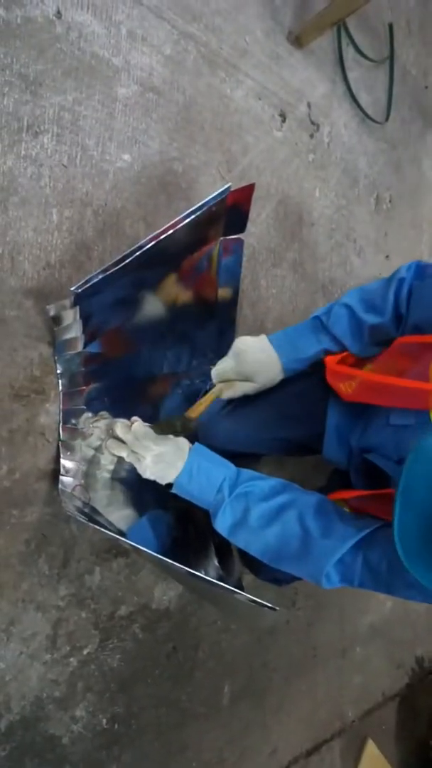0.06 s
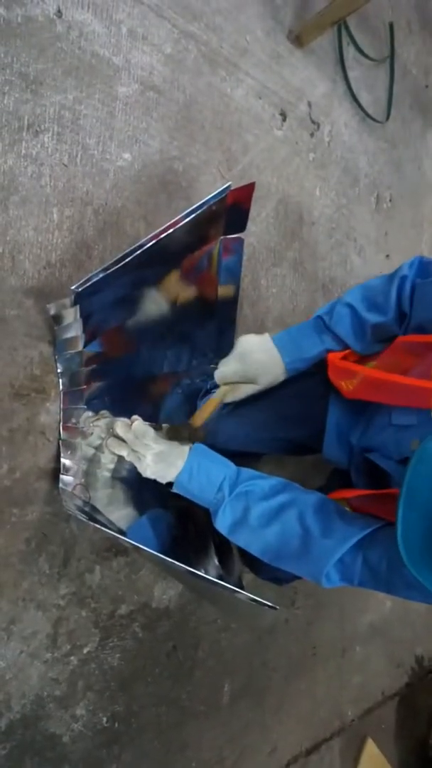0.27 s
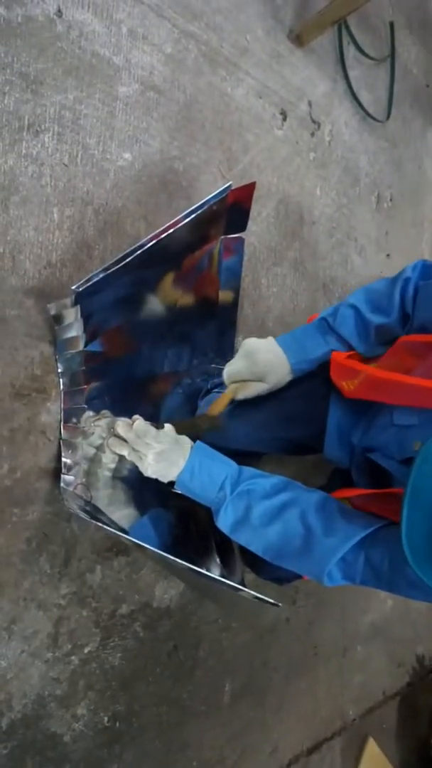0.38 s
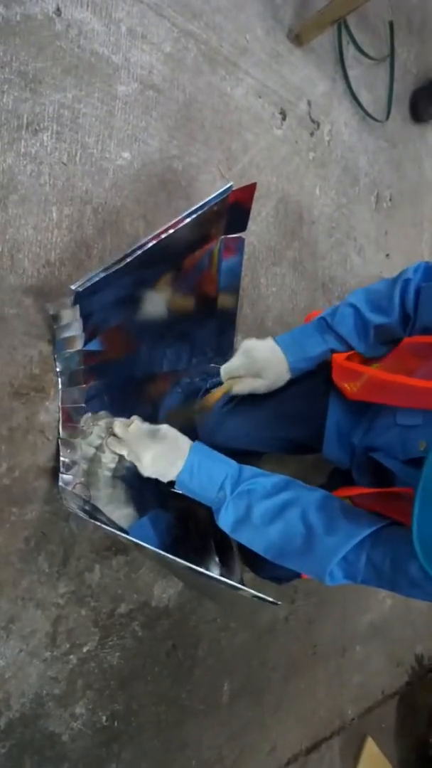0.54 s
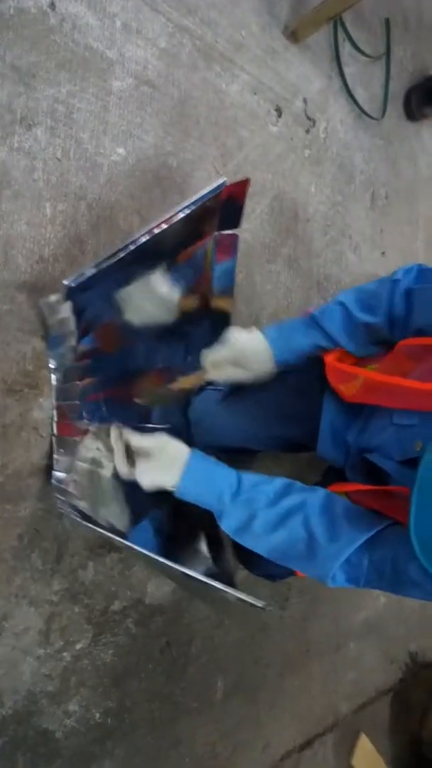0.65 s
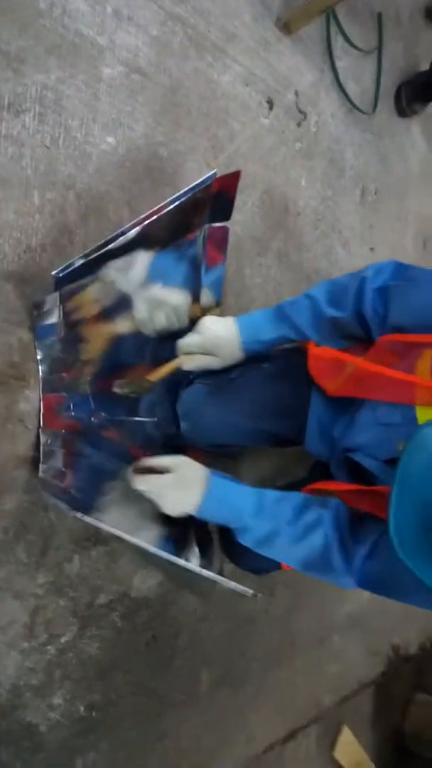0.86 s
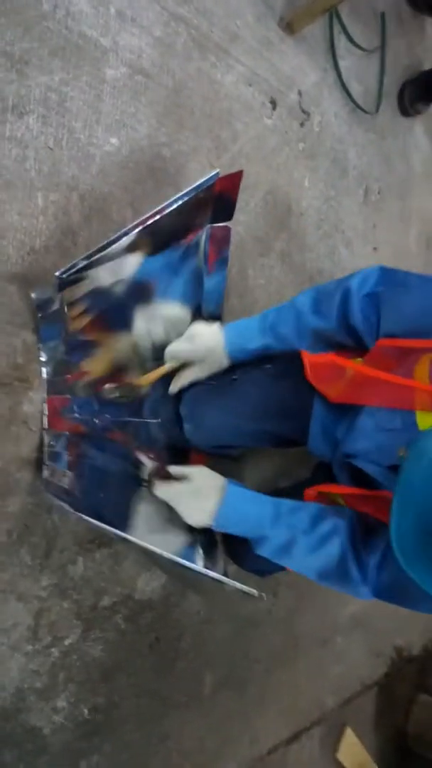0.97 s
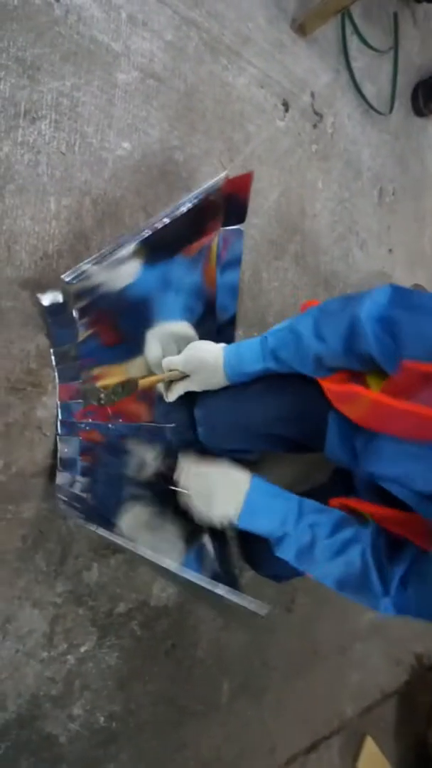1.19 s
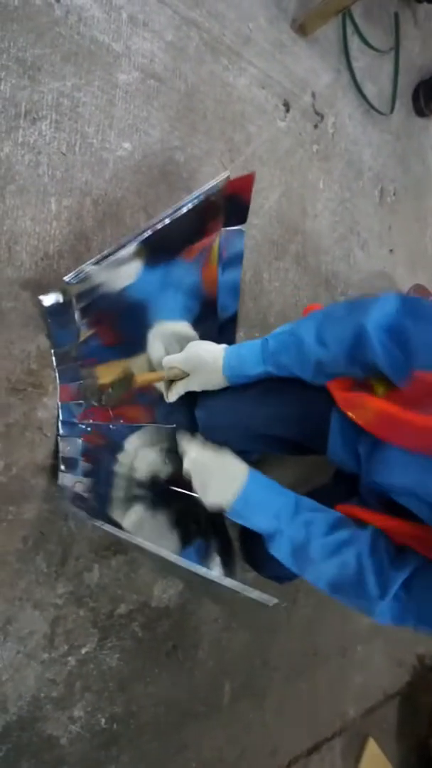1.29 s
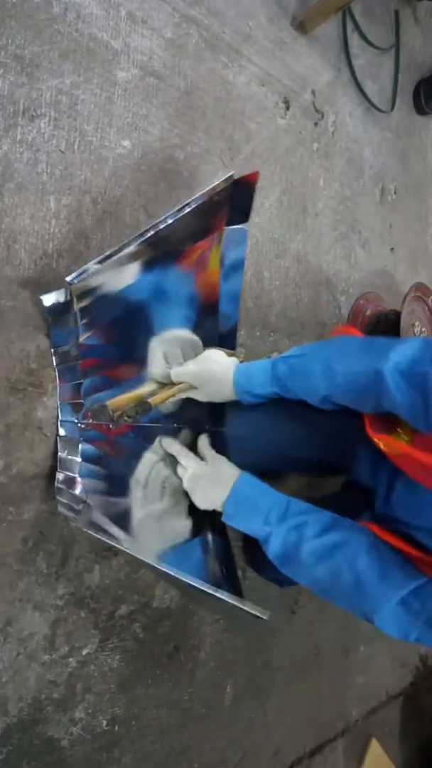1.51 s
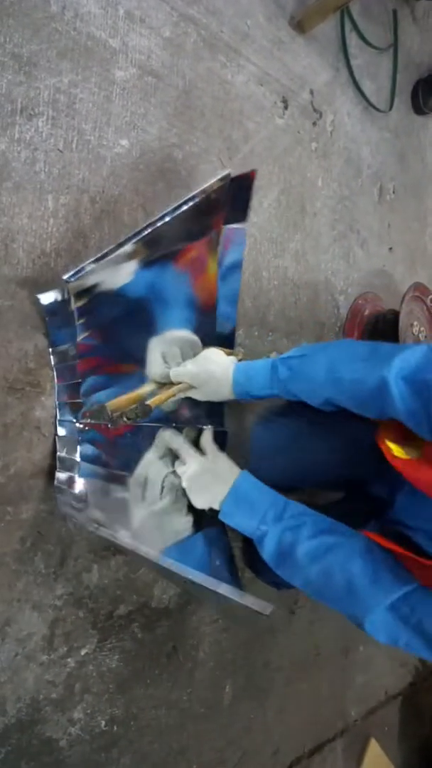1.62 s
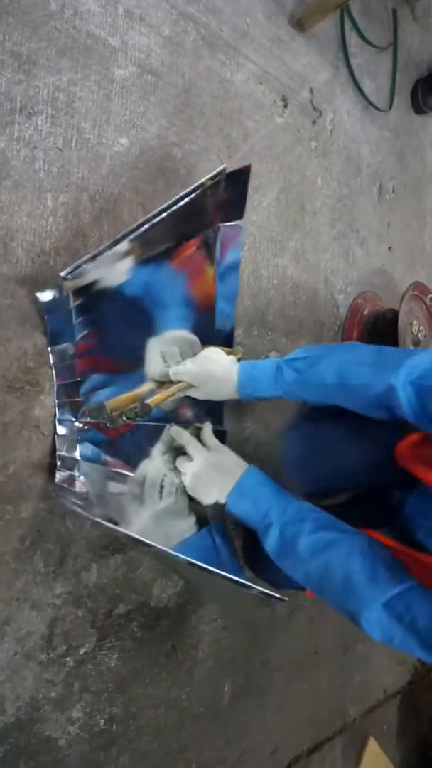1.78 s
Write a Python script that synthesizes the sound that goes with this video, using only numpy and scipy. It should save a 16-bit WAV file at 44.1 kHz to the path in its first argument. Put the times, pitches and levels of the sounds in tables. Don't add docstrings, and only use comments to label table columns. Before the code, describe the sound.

Three loud, bright hammer strikes on sheet metal, a brief scrape, another clanging hit, fading rattle

```python
import sys
import numpy as np
from scipy import signal
from scipy.fft import rfft, irfft
from scipy.io import wavfile
from scipy.ndimage import uniform_filter1d

SR = 44100
rng = np.random.default_rng(int(sys.argv[2]) if len(sys.argv) > 2 else 0)


def put_to_file(sound):
    columns = np.atleast_2d(sound).T
    safe = np.clip(columns, -1, 1)
    whole_steps = np.round(safe * 32767)
    wavfile.write(sys.argv[1], SR, whole_steps.astype(np.int16))


def voltage_ratio(decibels):
    exponent = np.asarray(decibels, float) / 20
    return 10 ** exponent


N = 81585
GATE_DB, GATE_RANGE_DB = 9.5, 17


def evened(x):
    return x / np.sqrt(np.mean(x ** 2) + 1e-20)


def read(points, hz):
    f, value = np.transpose(points)
    return np.interp(np.log(hz + 1), np.log(f + 1), value)


def add(mix, s, sound):
    part = mix[round(s * SR):][:len(sound)]
    part += sound[:len(part)]


def coloured(points, size):
    spectrum = rfft(rng.standard_normal(size))
    return evened(irfft(spectrum * voltage_ratio(read(points, np.fft.rfftfreq(size, 1 / SR))), size))


def resonate(x, hz, width):
    turn = np.exp(2j * np.pi * np.cumsum(hz * np.ones(len(x))) / SR)
    r = np.exp(-np.pi * width / SR)
    smooth = signal.lfilter([(1 - r) ** 2], [1, -2 * r, r * r], x / turn + 1e-18)
    return 2 * (turn * smooth).real


def slips(size):
    per_s, spread_db = 5000, 2.5
    strength = voltage_ratio(spread_db * np.minimum(rng.exponential(1, size), 4))
    return evened(strength * rng.standard_normal(size) * (rng.random(size) < per_s / SR))


def scrape():
    band = signal.butter(3, (338, 8000), "band", fs=SR, output="sos")
    return signal.sosfilt(band, slips(N))


def curve_gain(s, db):
    return voltage_ratio(np.interp(np.arange(N) / SR, s, db, left=-120, right=-120))


# frequency in Hz, level in dB.
AIR_SPECTRUM = [(30, -26), (250, -1), (650, -6), (1500, -8.5), (4500, -8), (6500, -17), (8200, -34.5),
                (12000, -52)]


def air():
    return voltage_ratio(-55.5) * coloured(AIR_SPECTRUM, N)


def clink():
    start_s, length_s, hz, width_hz, level_db = .095, .045, 1050, 450, -60
    from_middle = np.arange(N) / SR - start_s - length_s / 2
    swell = np.exp(-(from_middle / (length_s / 2)) ** 2)
    return voltage_ratio(level_db) * swell * evened(resonate(slips(N), hz, width_hz))


# frequency in Hz, level in dB.
PLATE_SPECTRUM = [(88, -62), (150, -28.5), (391, -20), (481, -15.5), (1020, -7.5), (1130, -11),
                  (1740, -1.5), (5570, -3.5), (9000, -13.5), (11700, -60), (19800, -120)]
# frequency in Hz, t60 in seconds.
PLATE_T60 = [(200, 0.27), (700, 0.56), (1800, 0.22), (3500, 0.22), (5000, 0.16), (8000, 0.04)]
# frequency in Hz, level in dB, t60 in seconds.
STRONG_MODES = [(1820, -4.5, .2), (2066, -5.5, .2), (2380, -9.5, .2), (2920, -7, .2), (2700, -4.5, .2),
                (3400, -8, .2), (3350, -6, .2), (4054, -9, .2), (4400, -10.5, .2), (4840, -10.5, .2),
                (5970, -10, .15), (6990, -10, .15)]


def plate_modes():
    dense = np.linspace(200, 8200, num=700) + rng.uniform(-4.5, 4.72, size=700)
    strong, strong_db, strong_t60 = np.transpose(STRONG_MODES)
    level_db = np.r_[read(PLATE_SPECTRUM, dense), read(PLATE_SPECTRUM, strong) + strong_db - 3.5]
    dense_t60 = read(PLATE_T60, dense) * np.exp(0.05 * rng.standard_normal(len(dense)))
    return np.r_[dense, strong], level_db, np.r_[dense_t60, strong_t60]


def chatter(t, level_db, t60):
    push = slips(len(t)) * voltage_ratio(-60 * (t / t60) ** 1.85)
    push *= voltage_ratio(level_db + 3.5) / np.linalg.norm(push)
    push[0] += 1
    return push


# frequency in Hz, level in dB.
CRACK_SPECTRUM = [(40, -48), (360, -55), (800, -13.5), (1500, -6), (2600, 1.5), (6300, -1.5), (7600, -13),
                  (16000, -54.5)]


def crack(t, tilt_db):
    return coloured(CRACK_SPECTRUM, len(t)) * voltage_ratio(0.5 + 5.6 * tilt_db - 60 * t / 0.018)


# frequency in Hz, level in dB.
SIZZLE_SPECTRUM = [(4410, -21), (7500, 6.5), (8460, -10), (9820, -12), (14700, -20.5), (16000, -51.5)]


def sizzle(t, tilt_db):
    return coloured(SIZZLE_SPECTRUM, len(t)) * voltage_ratio(-19 + 3 * tilt_db - 60 * t / 0.27)


def thud(t, tilt_db):
    u = t / 0.00089
    return voltage_ratio(-26.5 + 2.3 * tilt_db) * np.e * u * (1 - u / 2) * np.exp(-u)


# frequency in Hz, width in Hz, level in dB.
FLANGE = [(554, 220, -2.5), (2300, 1200, -5), (3294, 230, 2), (4120, 530, -16.5), (5370, 96, -1),
          (6660, 280, -11)]


def flange(linger):
    drive = linger * slips(N)
    out = np.zeros(N)
    for hz, width, db in FLANGE:
        out += voltage_ratio(db) * resonate(drive, hz, width) * np.sqrt(SR / width / 4) / 2
    return out


# start in seconds, strength in dB, brightness in dB per octave, chatter in dB, chatter t60 in seconds.
BLOWS = [
    (.2131, 2, .5, -4.5, 0.2),
    (.4293, 5, 1, -7, 0.28),
    (0.6144, 5, 1.5, -5.5, 0.23),
    (1.2138, -18.5, -0.5, -11.5, 0.14),
    (1.2184, -8.5, 1, -9, 0.037),
    (1.2202, -8, 1, -6, 0.24),
    (1.2325, -9, 0.5, -13, .11),
    (1.2701, -7, 1, -8, 0.32),
]
# start in seconds, strength in dB, brightness in dB per octave, chatter in dB, chatter t60 in seconds.
TAPS = [
    (1.1331, -34.5, -2, -5, .1),
    (1.5385, -33.5, 0, 0.5, 0.076),
    (1.5587, -42, 1, 2.5, .09),
    (1.6605, -40.5, -1, -13.5, 0.098),
]


def sheet():
    linger_db, linger_t60, linger_rise_s = -21, 0.91, .12
    rise_s, scatter_db = 0.0011, -1
    t = np.arange(SR * 3 // 5) / SR
    hz, level_db, t60 = plate_modes()
    pole = 2j * np.pi * hz - np.log(1000) / t60
    coarse, fine = np.exp(np.outer(t[::180], pole)), np.exp(np.outer(pole, t[:180]))
    out, linger = np.zeros(N), np.zeros(N)
    for s, strength_db, tilt_db, chatter_db, chatter_t60 in BLOWS + TAPS:
        scatter = scatter_db * rng.standard_normal(len(hz))
        share = voltage_ratio(level_db + tilt_db * np.log2(hz / 2500) + scatter)
        sign = rng.choice([-1., 1.], len(hz))
        ring = (coarse * share * sign @ fine).imag.ravel()
        push = chatter(t, chatter_db, chatter_t60)
        sound = signal.fftconvolve(push, ring / np.std(ring[:2000]))[:len(t)] / 2
        sound += crack(t, tilt_db) + sizzle(t, tilt_db) + thud(t, tilt_db)
        add(out, s, voltage_ratio(strength_db) * np.minimum(t / rise_s, 1) ** 2 * sound)
        fade = voltage_ratio(strength_db + linger_db - 60 * t / linger_t60)
        add(linger, s, fade * (1 - np.exp(-t / linger_rise_s)))
    return out + flange(linger)


# frequency in Hz, t60 in seconds.
SHOP_T60 = [(150, 0.45), (700, 0.46), (2500, 0.57), (6000, 0.39), (12000, 0.3)]


def shop(x):
    taps = np.zeros(SR)
    at = np.arange(300, SR - 20, 20)
    taps[at + rng.integers(0, 20, at.shape)] = rng.choice([-1., 1.], at.shape)
    hz, t, z = signal.stft(taps, SR, nperseg=256)
    tail = signal.istft(z * voltage_ratio(-60 * t / read(SHOP_T60, hz)[:, None]), SR, nperseg=256)[1]
    return voltage_ratio(-7) * signal.fftconvolve(x, tail / np.linalg.norm(tail))[:N]


# time in seconds, level in dB, brightness in dB per octave.
DRAG = [(1.108, -54, -5), (1.112, -31, -2), (1.131, -27, 0), (1.136, -22, -0.5), (1.161, -23, 2),
        (1.208, -27.5, 3.5), (1.23, -20, -2)]
# frequency in Hz, width in Hz, level in dB.
PANEL = [(743, 242, -0.5), (1347, 410, -8.5), (1621, 370, -5.5), (2390, 440, -8.5), (3600, 800, -16),
         (5300, 770, -25)]


def drag():
    bend, bend_s, flexed_s = .22, .006, 0.034
    s, db, tilt_db = np.transpose(DRAG)
    t = np.arange(N) / SR
    tilt_db, drive = np.interp(t, s, tilt_db), scrape()
    sharpened = 1 + bend * np.clip((s[0] + flexed_s - t) / bend_s, 0, 1)
    out = np.zeros(N)
    for k, (hz, width, level_db) in enumerate(PANEL):
        tone = evened(resonate(drive, hz * (sharpened if k == 0 else 1), width))
        out += voltage_ratio(level_db + tilt_db * np.log2(hz / 800)) * tone
    return curve_gain(s, db - 3) * out


# time in seconds, level in dB.
RATTLE = [(1.5, -37), (1.532, -40.5), (1.543, -29.5), (1.6, -45), (1.65, -42), (1.665, -36.5),
          (1.73, -38.5), (1.78, -49), (1.85, -52.5)]
# frequency in Hz, width in Hz, level in dB.
LOOSE = [(2700, 660, 6.5), (3230, 710, 6.5), (5306, 200, -1.5), (6610, 550, -5), (8200, 950, -30),
         (1400, 400, -22.5)]


def rattle():
    s, db = np.transpose(RATTLE)
    drive = scrape()
    out = np.zeros(N)
    for hz, width, level_db in LOOSE:
        out += voltage_ratio(level_db) * evened(resonate(drive, hz, width))
    return curve_gain(s, db + 1) * evened(out)


def scene():
    metal = sheet() + drag() + rattle()
    quiet = voltage_ratio(GATE_DB) * (air() + clink())
    mono = metal + shop(metal) + quiet
    return np.array([mono, mono])


def gate(x):
    z = signal.stft(x, nperseg=256)[2]
    power = uniform_filter1d(abs(z) ** 2, size=5, axis=0)
    power = uniform_filter1d(power, size=5, axis=1, origin=2)
    power_db = 10 * np.log10(abs(power) + 1e-16)
    over_db = power_db - np.percentile(power_db, q=10, axis=1)[:, None]
    cut_db = GATE_DB * np.clip(1 - over_db / GATE_RANGE_DB, 0, 1)
    return signal.istft(z * voltage_ratio(-cut_db), nperseg=256)[1][:N]


def squeeze(x):
    limit_db, share, recover_db_per_s = -16, 0.35, 67.5
    power_db = 10 * np.log10(abs(uniform_filter1d(x ** 2, size=200, origin=99)) + 1e-12)
    fall = np.arange(N) * recover_db_per_s / SR
    held_db = np.maximum.accumulate(power_db + fall) - fall
    over_db = np.maximum(held_db - limit_db, 0)
    return x / voltage_ratio(share * uniform_filter1d(over_db, size=300, origin=149))


def roll_off(x):
    return signal.sosfilt(signal.butter(12, 16340, fs=SR, output="sos"), x)


def record(dry):
    low_cut = signal.butter(2, 40, "high", fs=SR, output="sos")
    heard = gate(signal.sosfilt(low_cut, dry[0]))
    mid = np.clip(squeeze(heard), -1, 1)
    top_cut = signal.firwin(127, 15100, fs=SR)
    mid = np.clip(signal.oaconvolve(mid, top_cut, "same"), -1, 1)
    return roll_off(np.array([mid, mid]))


dry = scene()
out = record(dry)
put_to_file(out)
```